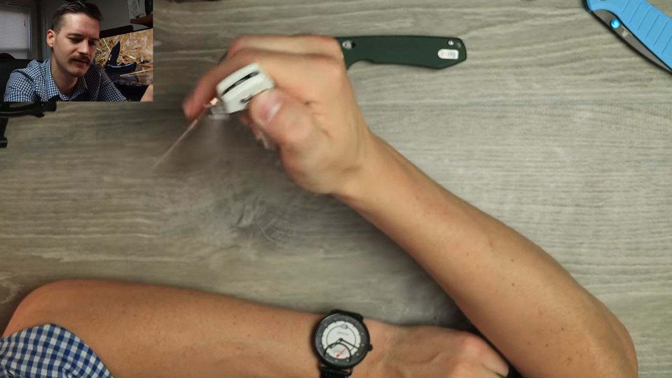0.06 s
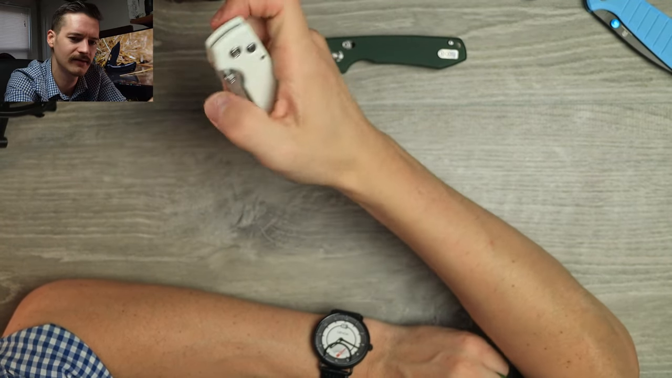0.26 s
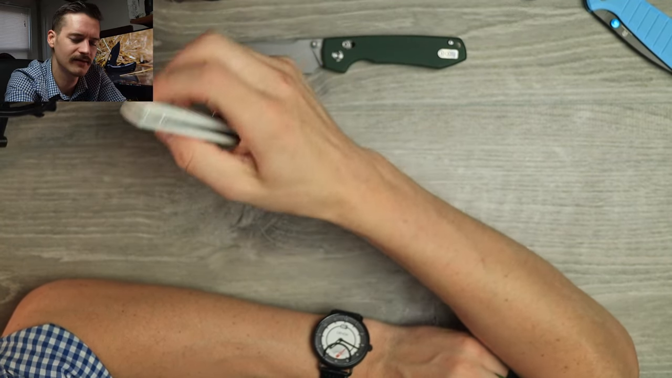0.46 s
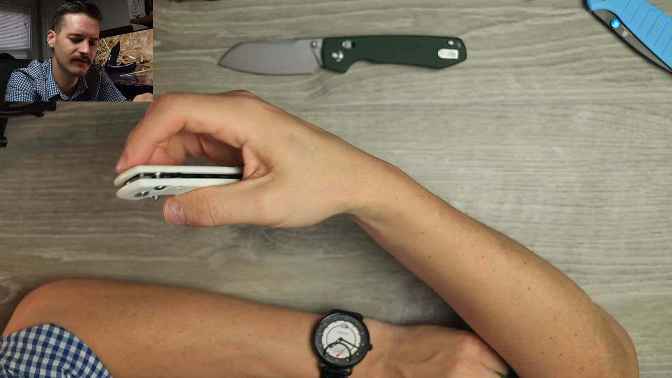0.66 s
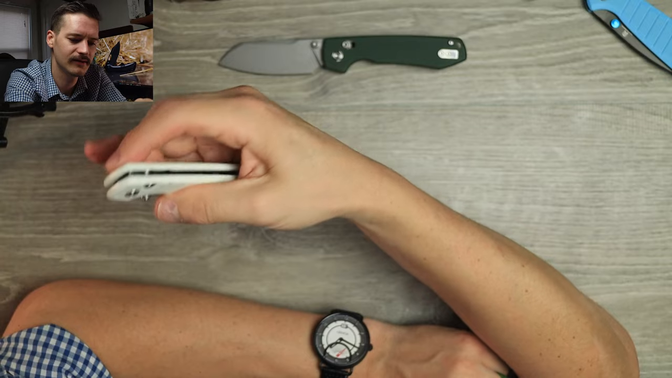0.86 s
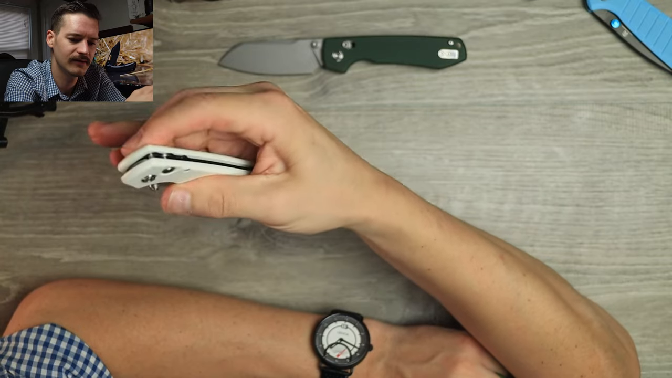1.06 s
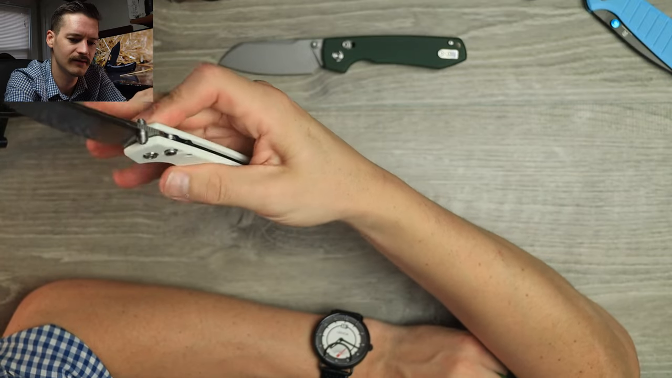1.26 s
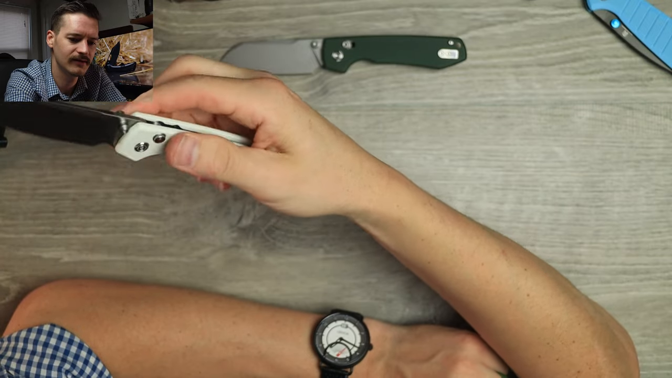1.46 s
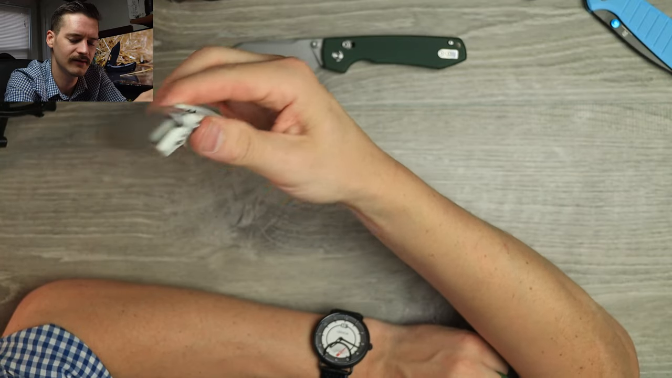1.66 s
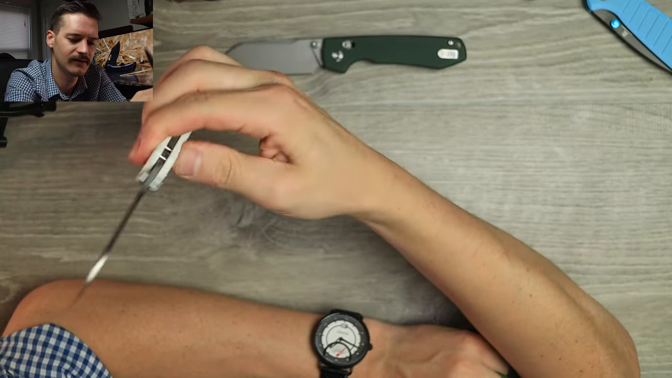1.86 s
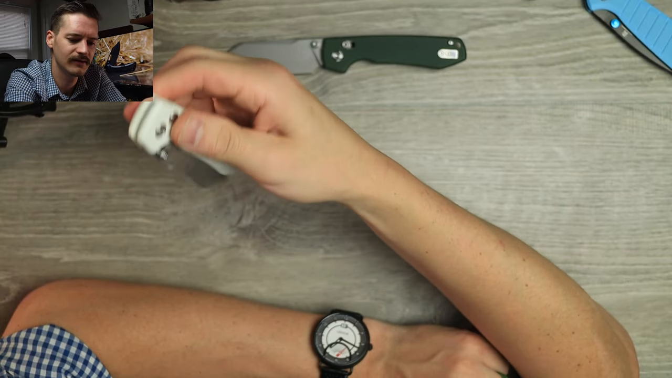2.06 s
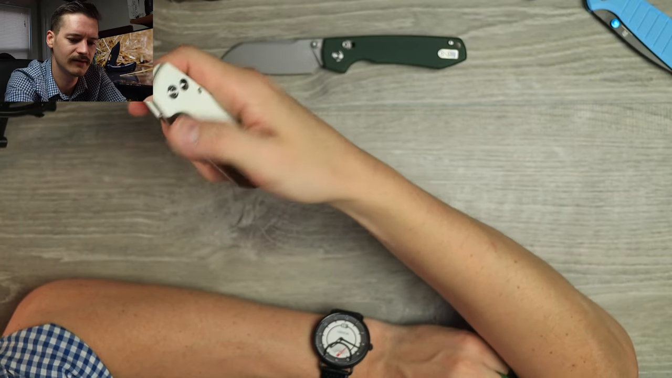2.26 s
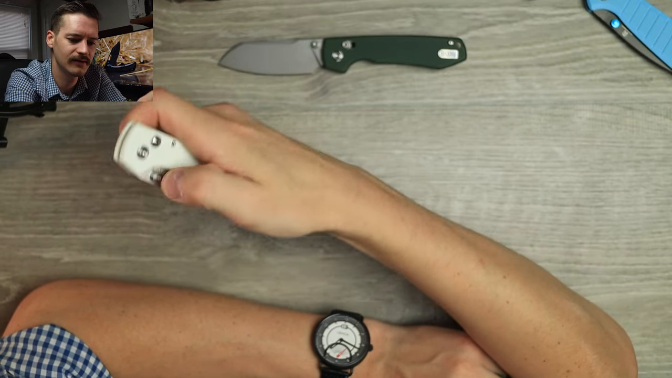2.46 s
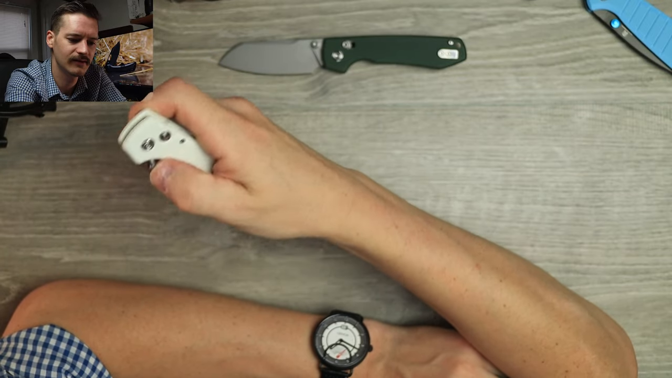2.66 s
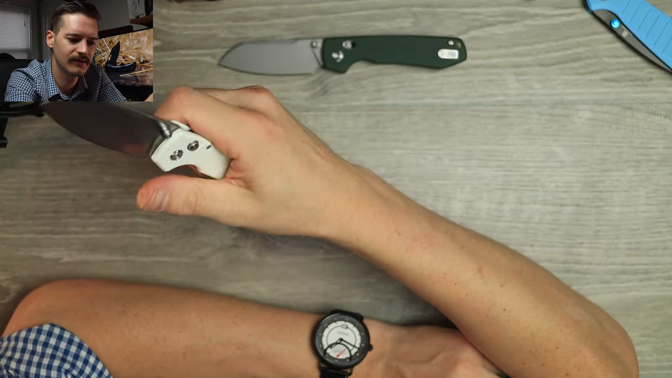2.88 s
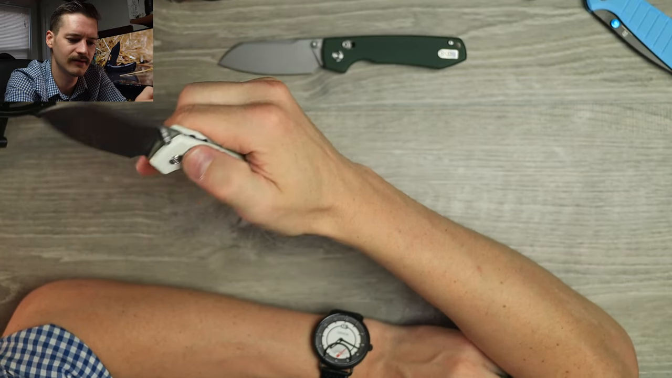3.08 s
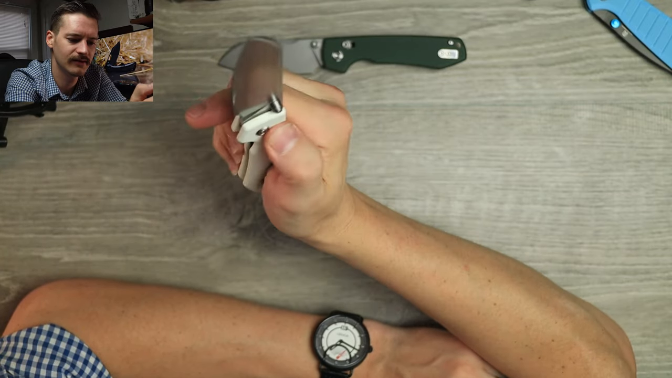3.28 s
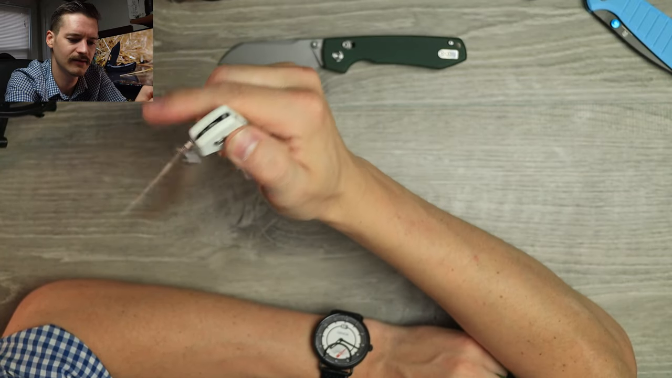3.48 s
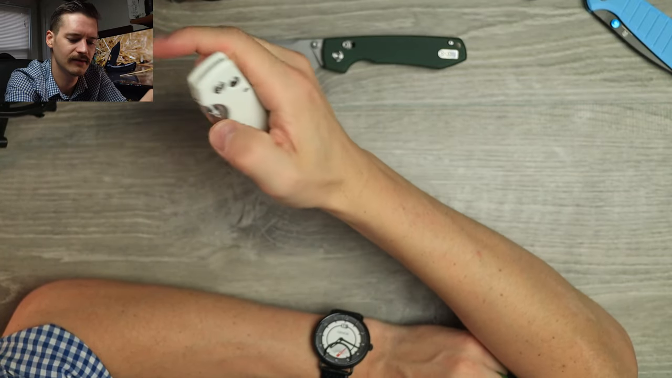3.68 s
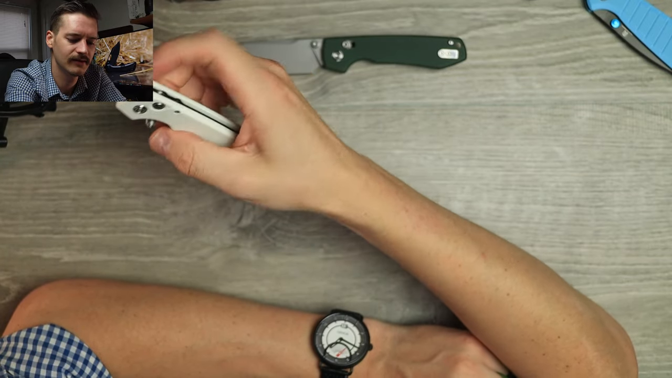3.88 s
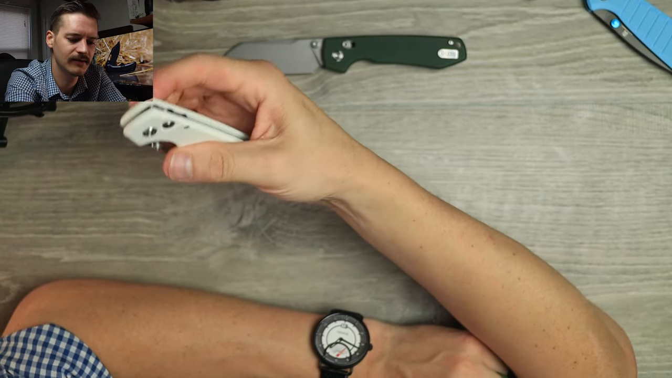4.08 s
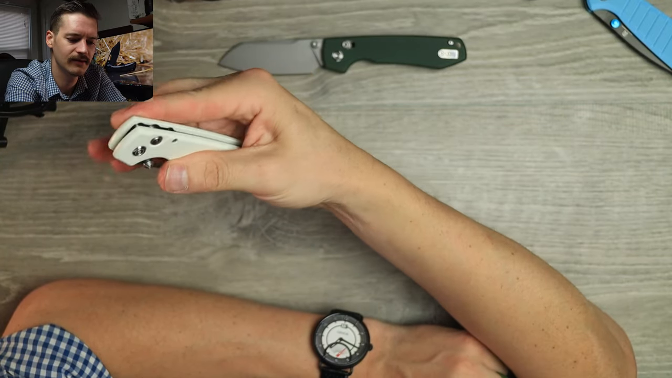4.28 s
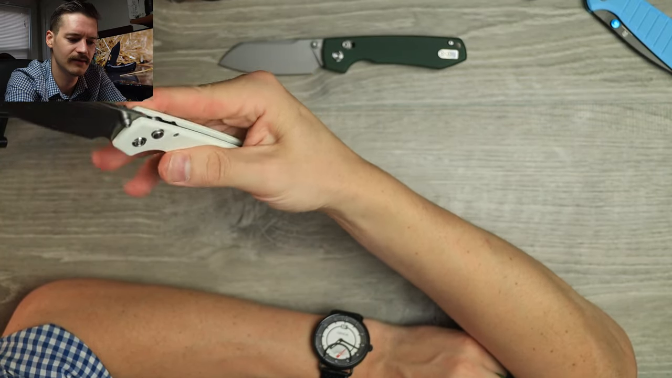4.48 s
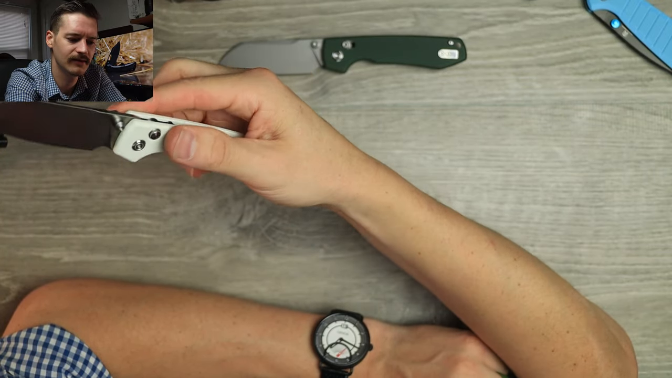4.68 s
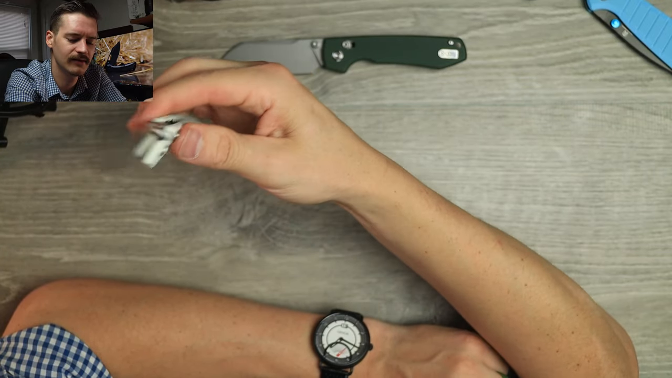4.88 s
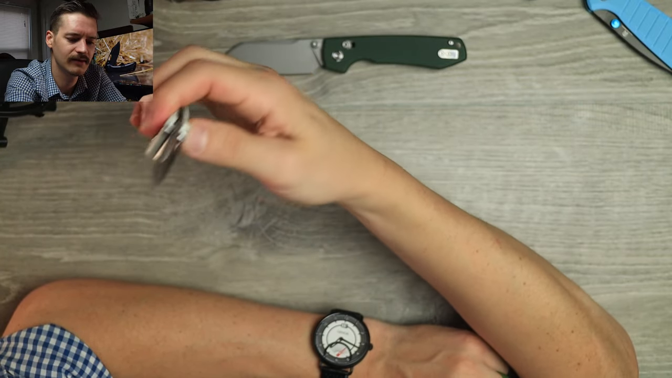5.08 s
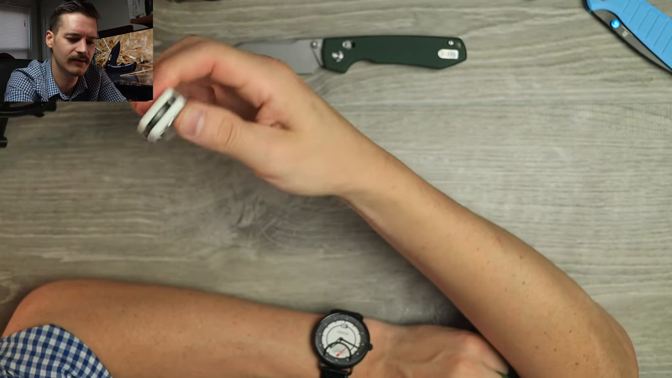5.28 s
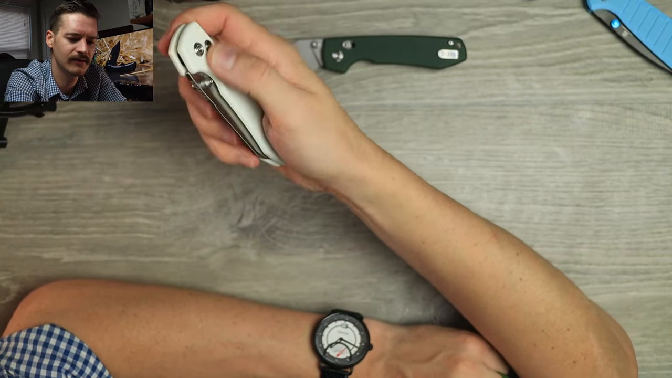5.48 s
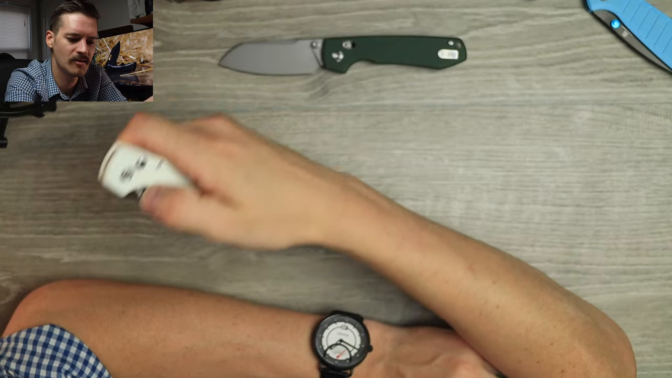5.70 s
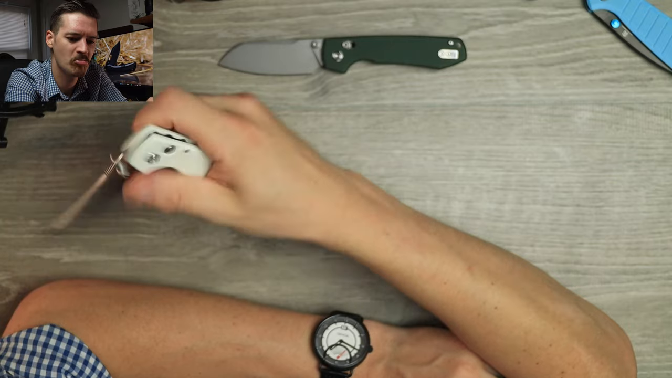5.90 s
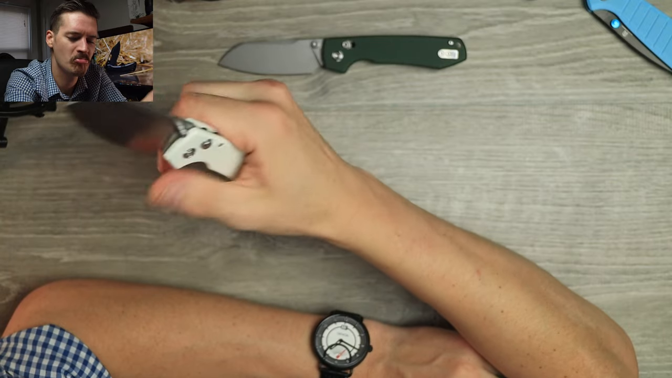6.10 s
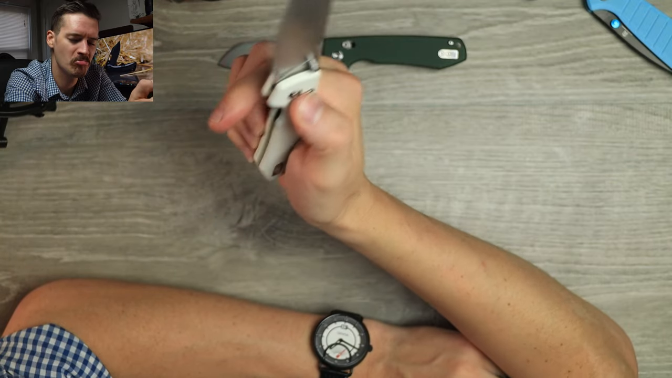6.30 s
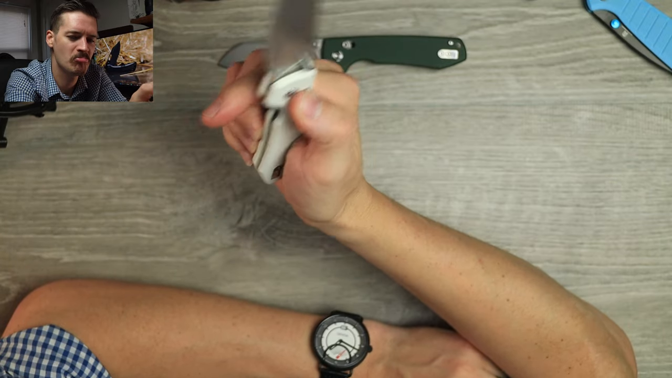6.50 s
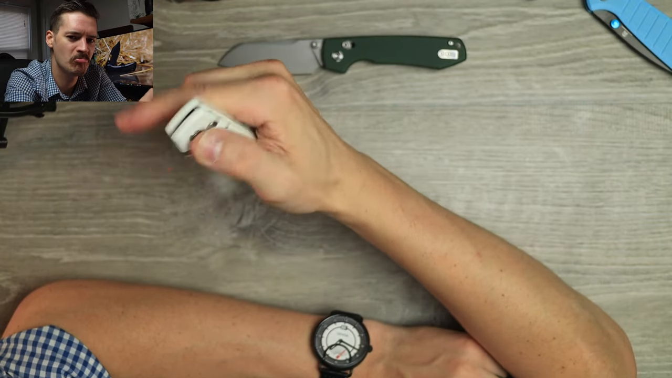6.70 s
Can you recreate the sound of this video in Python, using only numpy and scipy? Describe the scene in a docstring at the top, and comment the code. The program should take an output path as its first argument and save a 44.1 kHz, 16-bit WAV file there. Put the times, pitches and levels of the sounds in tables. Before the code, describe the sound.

Crisp steel snaps alternate as a pocket knife locks open and drops closed, with tiny ticks, skin rubs and soft air puffs over low room rumble.

```python
"""A folding knife is flicked open and dropped shut, again and again, close to a microphone over a desk.
The blade chatters against its stop for a few milliseconds and excites the hand-damped resonances of the knife;
lightly damped blade modes sing on briefly. Pivot and fingers rub as noise through resonances, and each
swing pushes a slow wave of air at the microphone. A small room answers with a decaying diffuse tail,
over steady rumble, hiss and a faint hum."""
import sys
import numpy as np
from scipy import signal
from scipy.fft import rfft, irfft, next_fast_len
from scipy.io import wavfile

SR = 44100
rng = np.random.default_rng(int(sys.argv[2]) if len(sys.argv) > 2 else 0)


def master(y):
    """Save y as 16-bit WAV."""
    cut = np.clip(np.atleast_2d(y).T, -1, 1)
    pcm = np.round(cut * 32767)  # scale
    wavfile.write(sys.argv[1], SR, pcm.astype(np.int16))


N = 297536
SIZE = 16384  # samples in each single sound
HZ = np.maximum(np.fft.rfftfreq(SIZE, 1 / SR), 1)
AGE = np.arange(SIZE) / SR  # s since the start of a sound
MS_GAIN = np.sqrt(SR / 1000)  # sets a level as that of the energy packed into one millisecond


def undb(db):
    """Logarithmic level: decibels to amplitude gain."""
    return 10 ** (np.asarray(db) / 20)


def decay(t60):
    """Exponential decay: the envelope falls by 60 dB in t60 seconds."""
    return undb(-60 * AGE / t60)


def unit(x):
    """Energy normalisation: the squares sum to one."""
    return x / np.sqrt(np.sum(x ** 2))


def add(track, s, sound):
    """Superposition: mix a sound into the track at time s."""
    i = max(int(s * SR), 0)
    track[i:i + len(sound)] += sound[:len(track) - i]


def colour(points, hz):
    """Spectral envelope: gain along (f/Hz, level/dB) points on a log-frequency axis."""
    f, db = np.transpose(points)[:2]
    return undb(np.interp(np.log(np.maximum(hz, 1)), np.log(f), db))


def tilt(db):
    """Spectral slope: dB per octave above 1 kHz, level below it."""
    return undb(db * np.log2(np.maximum(HZ, 1000) / 1000))


def noise(gain, size):
    """Filtered random noise: the given spectrum at an rms of one."""
    x = irfft(rfft(rng.standard_normal(size)) * gain, size)
    return x / x.std()


def causal(gain):
    """Minimum phase: the quickest-dying impulse response with this spectrum, by folding the cepstrum."""
    cepstrum = irfft(np.log(gain + 1e-9))
    cepstrum[1:SIZE // 2] *= 2
    cepstrum[SIZE // 2 + 1:] = 0
    return irfft(np.exp(rfft(cepstrum)))


def through(sound, response):
    """Linear filtering: convolve a sound with an impulse response."""
    return signal.fftconvolve(sound, response)[:SIZE]


def resonances(hz, width, db):
    """Modal resonance: the summed power response of damped modes, as a gain."""
    detune = (HZ ** 2 - hz ** 2) / (HZ * width)
    return np.sqrt(np.sum((undb(db) / (1 + detune ** 2)) ** 2, axis=0))


def by_grip(first, second, grip):
    """Linear interpolation: blend the values of two grips."""
    return first + grip * (second - first)


# spectrum of room rumble and hiss: f/Hz, relative level/dB
RUMBLE_AND_HISS = [(20, -3), (31, -2.5), (45, -11.5), (98, -6), (130, -10.5), (400, -15.5), (520, -22),
                   (1150, -24.5), (1370, -24.5), (1600, -22.5), (3740, -37), (8000, -45), (13200, -52.5),
                   (16000, -57.5)]
FLOOR_DB = -56.5  # rms level of rumble and hiss
# hum and whirr of equipment: f/Hz, half-width at half amplitude/Hz, rms level/dB
EQUIPMENT_HUM = [(100.6, 1.7, -67), (306, 4, -79.5), (1170, 60, -71.5), (1610, 69, -76)]


def background():
    """Incoherent addition: rumble, hiss and narrow lines of running equipment add in power."""
    size = next_fast_len(N, True)
    hz = np.fft.rfftfreq(size, 1 / SR)
    # the microphone rolls off the deepest rumble
    roll_off = hz / np.hypot(hz, 25)
    power = (undb(FLOOR_DB) * unit(colour(RUMBLE_AND_HISS, hz) * roll_off)) ** 2
    for centre, width, db in EQUIPMENT_HUM:
        line = unit(1 / (1 + ((hz - centre) / width) ** 2))
        power += (undb(db) * line) ** 2
    return np.sqrt(power.sum()) * noise(np.sqrt(power), size)[:N]


# bands of the room's answer: f/Hz, relative level/dB, t60/s
ROOM_BANDS = [(300, -7, 0.13), (1000, -0.5, .27), (2500, -2, .27), (5000, 4, 0.2), (7900, 0, 0.17),
              (11000, -1.5, 0.17), (11700, -7, 0.17), (16000, -7.5, 0.25)]


def room(delay_s=0.0037, build_s=0.0017):
    """Diffuse reverberation: random noise, drawn anew each time, decays at its own rate in each band."""
    hiss = rfft(rng.standard_normal(SIZE))
    centres = np.log([row[0] for row in ROOM_BANDS])
    tail = 0
    # overlapping bands whose shares add up to one
    for share, (_, band_db, t60) in zip(np.eye(len(ROOM_BANDS)), ROOM_BANDS):
        band = irfft(hiss * np.interp(np.log(HZ), centres, share))
        tail = tail + band * undb(band_db) * decay(t60)
    return unit(tail * np.clip((AGE - delay_s) / build_s, 0, 1))


# resonances of the rubbed blade and liners: f/Hz, full width at half gain/Hz, relative level/dB
RUBBED_MODES = [(1700, 1400, -17), (3340, 550, -6), (4700, 500, -2.5), (6300, 2800, -1), (8400, 900, 3),
                (9600, 1700, -3.5), (11200, 900, -2.5), (12700, 5100, -3.5), (14500, 5400, -3.5)]


def friction(db, tilt_db, grain_db=3.0, stutter_db=2.5, spot_db=3):
    """Stick-slip friction: dense tiny slips of skin and steel ring the knife."""
    hz, width, mode_db = np.transpose(RUBBED_MODES)[:, :, None]
    slips = rng.standard_normal(SIZE) * undb(grain_db * rng.exponential(size=SIZE))
    # each stroke touches another spot and favours other modes
    body = resonances(hz, width, mode_db + spot_db * rng.standard_normal(hz.shape))
    rub = through(slips, causal(body * tilt(tilt_db)))
    # the level stutters at rates below 90 Hz
    return rub / rub.std() * undb(db + stutter_db * noise(HZ < 90, SIZE))


def stroke(length, swell=1.2):
    """Velocity envelope: a finger starts, slides and stops."""
    return np.sin(np.pi * np.clip(AGE / abs(length), 0, 1)) ** swell


FIDGETS_PER_S, FIDGET_S = 2.2, .05  # mean length of a fidget in s
FIDGET_DB, FIDGET_SPREAD_DB, FIDGET_TILT_DB = -73, 3, -3  # level, spread to either side, dB per octave


def fidgets():
    """Random timing: faint short strokes at independent, uniformly drawn moments."""
    out = np.zeros(N)
    for when, strength, length in rng.random((int(FIDGETS_PER_S * N / SR), 3)):
        db = FIDGET_DB + FIDGET_SPREAD_DB * (2 * strength - 1)
        rub = stroke(FIDGET_S * (.5 + length)) * friction(db, FIDGET_TILT_DB)
        add(out, when * N / SR, rub)
    return out


# the fingers slide to a new hold: start t/s, length/s, level/dB, tilt/(dB per octave)
FINGER_RUBS = [(.486, .1, -70.5, -3), (0.634, .051, -58.5, -1.5), (1.485, 0.078, -66.5, -2),
               (1.678, 0.094, -63.5, -1.5), (2.149, 0.1, -62.5, -1), (3.858, .045, -60, -8),
               (3.896, 0.13, -65, 2), (4.042, 0.06, -61.5, 0), (4.145, 0.025, -59, 6), (4.23, .022, -64, 4),
               (4.674, 0.048, -58, -1), (4.872, 0.14, -64, -2.5), (5.499, 0.17, -63.5, -3.5)]
# before a flick the finger scrapes harder until the detent lets go, then the friction dies away
PUSH_S, FLICK_DB, FLIGHT_FADE_DB_PER_S = .0215, -48, 550.5
FINGER_TILT_DB, THUMB_TILT_DB = 0, -4.5  # dB per octave
# the pivot rubs as the blade swings in
SWING_S, SWING_DB, SWING_TILT_DB = .068, -50.5, -5  # level relative to the landing, dB per octave
# after each snap the grip relaxes with a faint rub
SETTLE_DELAY_S, SETTLE_S, SETTLE_DB, SETTLE_TILT_DB = 0.15, 0.082, -72.5, -3


def rubbing(room_db=-11, push_power=.5, swing_power=0.65):
    """Sliding friction: loudness follows effort or speed before each snap, after it and in between."""
    out = np.zeros(N)
    for s, _, _, grip, *_, flight, _ in OPEN_SNAPS:
        push = np.minimum(AGE / PUSH_S, 1) ** push_power
        fade = undb(-FLIGHT_FADE_DB_PER_S * np.maximum(AGE - PUSH_S, 0))
        rub = friction(FLICK_DB, by_grip(FINGER_TILT_DB, THUMB_TILT_DB, grip))
        add(out, s - flight - PUSH_S, push * fade * rub)
    for s, db, *_ in SHUT_SNAPS:
        speed = (AGE / SWING_S) ** swing_power * (AGE < SWING_S)
        add(out, s - SWING_S, speed * friction(db + SWING_DB, SWING_TILT_DB))
    for s, *_ in OPEN_SNAPS + SHUT_SNAPS:
        add(out, s + SETTLE_DELAY_S, stroke(SETTLE_S) * friction(SETTLE_DB, SETTLE_TILT_DB))
    for s, length, db, tilt_db in FINGER_RUBS:
        add(out, s, stroke(length) * friction(db, tilt_db))
    out += fidgets()
    return out + undb(room_db) * signal.oaconvolve(out, room())[:N]


# air pushed by the flick and by the recoil of the hand:
# delay after the lock t/s, level/dB with finger, level/dB with thumb, f/Hz with finger, f/Hz with thumb
FLICK_WAVES = [(-.025, -33, -41, 37.88, 50), (.015, -35, -35.5, 30, 62)]
CLOSING_AIR_DB, CLOSING_AIR_HZ = -35.5, 50  # level relative to the landing
AIR_CYCLES = .65  # half the length of a wave of air, to 1/e of its envelope


def air():
    """Bulk airflow: each swing sends a slow wave over the microphone; a finger flick moves the hand further."""
    waves = [(s, db + CLOSING_AIR_DB, CLOSING_AIR_HZ) for s, db, *_ in SHUT_SNAPS]
    for s, _, _, grip, *_ in OPEN_SNAPS:
        for delay, finger_db, thumb_db, finger_hz, thumb_hz in FLICK_WAVES:
            db = by_grip(finger_db, thumb_db, grip)
            waves.append((s + delay, db, by_grip(finger_hz, thumb_hz, grip)))
    out = np.zeros(N)
    lead_s = .1  # room for the rise before the centre of the wave
    for s, db, hz in waves:
        cycles = hz * (AGE - lead_s)
        envelope = np.exp(-(cycles / AIR_CYCLES) ** 2)
        add(out, s - lead_s, -undb(db) * np.sin(2 * np.pi * cycles) * envelope)
    return out


def chatter(ms, fade=.7, count=40, size=1024):
    """Repeated contact: a brief, weakening rattle of steel on steel that holds all frequencies evenly."""
    share = AGE[:size] / (ms / 1000)
    x = rng.standard_normal(size) * np.exp(-fade * share)
    # alternate between a flat spectrum and a limited duration
    for _ in range(count):
        spectrum = rfft(x * (share < 1))
        x = irfft(spectrum / (abs(spectrum) + 1e-9))
    return x * (share < 1)


def blow(modes, db, ms, grip, tilt_db, pitch, room_db, buzz_db, buzz_t60=0.018, focus=0.6):
    """Impact excitation: chatter drives the knife's resonances, then the buzz and the room follow."""
    hz, width, first_db, second_db = np.transpose(modes)[:, :, None]
    # the hand damps different resonances in each grip
    body = resonances(hz * pitch, width, by_grip(first_db, second_db, grip))
    contacts = chatter(ms)
    direct = unit(through(contacts, causal(body * tilt(tilt_db))))
    # summed over all directions the knife radiates a more even spectrum
    scattered = unit(through(contacts, causal(body ** focus * tilt(tilt_db))))
    # liners and screws buzz for a moment after the blow
    buzz = unit(rng.standard_normal(SIZE) * decay(buzz_t60) * (AGE > .0015))
    buzz = unit(through(buzz, causal(tilt(-1.7))))
    after = through(scattered, undb(buzz_db) * buzz + undb(room_db) * room())
    return undb(db) * MS_GAIN * (direct + after)


def blade_ring(modes, db, grip):
    """Free vibration: decaying sine modes sing on after a blow, favoured according to the grip."""
    ring = 0
    for hz, first_db, second_db, t60 in modes:
        wander = 1 + .001 * rng.standard_normal()
        mode = np.sin(2 * np.pi * hz * wander * AGE) * decay(t60)
        ring = ring + unit(mode) * undb(by_grip(first_db, second_db, grip))
    return ring * undb(db) * MS_GAIN


def grazed(snaps, graze_db=-24, graze_s=.0011):
    """Precursor contact: the blade grazes the lock bar just before it lands, a faint early copy of the snap."""
    return snaps + undb(graze_db) * np.roll(snaps, -int(graze_s * SR))


def tick(db, tilt_db, buzz_db=-9, room_db=-13):
    """Weak impact: a light touch of steel on steel rings the open knife's resonances."""
    return blow(OPEN_MODES, db, ms=1.1, grip=.65, tilt_db=tilt_db, pitch=1.02, room_db=room_db, buzz_db=buzz_db)


# the lock bar and the loose blade tick in the hand: t/s, level/dB, tilt/(dB per octave)
HAND_TICKS = [(0.7228, -56.5, 3), (1.795, -43.5, 1.5), (2.0173, -46.5, 1), (3.2247, -47.5, -3),
              (3.2482, -42.5, 0), (3.3589, -48, -3), (3.8802, -48.5, -1), (3.9229, -46.5, 3),
              (4.0409, -35.5, 5.5), (5.3146, -49.5, 0), (6.369, -54.5, -2.5)]


def ticks():
    """Isolated weak impacts: loose parts touch while the knife is handled."""
    out = np.zeros(N)
    for s, db, tilt_db in HAND_TICKS:
        add(out, s, tick(db, tilt_db))
    return out


# resonances of the shut knife:
# f/Hz, full width at half gain/Hz, level/dB in a loose grip, level/dB in a firm grip
SHUT_MODES = [(600, 2100, -24, -31.5), (956, 230, -24.5, -18.5), (1840, 180, -4, -11), (2109, 314, -9, -10),
              (2990, 470, -9.5, -12), (3670, 180, -15, -12.5), (4240, 850, -11, -13.5),
              (5010, 170, -7.5, 2.5), (5460, 240, -11.5, -6), (5893, 590, -28, 1.5), (6560, 610, 1.5, -7.5),
              (7460, 1000, -16.5, -12), (8080, 349, -4.5, -13.5), (8670, 270, -8.5, -7),
              (9159, 570, -13.5, -11.5), (9780, 510, -20.5, -10.5), (10300, 301, -8, -26.5),
              (11680, 890, -19, -18), (13300, 2400, -19.5, -28.5), (13900, 840, -8.5, -17.5),
              (14700, 1116, -22.5, -23)]
# the blade held in the shut handle: f/Hz, level/dB in a loose grip, level/dB in a firm grip, t60/s
HELD_BLADE_MODES = [(1940, -26, -32, 0.092), (4940, -38.5, -26.5, 0.13), (5170, -27.5, -30, 0.1),
                    (5560, -32, -28.5, .17), (5910, -32, -27, .16), (6600, -21, -32.5, 0.063),
                    (8150, -23.5, -40, 0.097), (13900, -30.5, -42.5, .08)]
# the blade falls shut or the lock bar clicks: t/s, level/dB, chatter/ms, grip (0 loose - 1 firm),
# tilt/(dB per octave), pitch factor, room level/dB, buzz level/dB
SHUT_SNAPS = [(0.1956, -9, 3.2, 0.029, 0.9, 1.006, -19, -10.5),
              (2.0716, -6.5, 3.44, 0.96, 0.9, 0.997, -25.5, -13.5),
              (2.4193, -29, 3, 0.81, 0.4, 0.94, -18.5, 1.5),
              (3.6234, -8.5, 2.66, 0.12, 2.5, 0.99, -22, -14),
              (5.3891, -8, 4.2, 0.89, 0.2, 0.971, -23.5, -12), (5.5629, -26.3, 4.8, .4, 1.5, 0.98, -29, -9)]
BRUSH_LEAD_S, BRUSH_DB = 0.01, -48.5
REBOUND_S, REBOUND_DB = 0.025, -31.5  # level relative to the landing


def closings():
    """Impact and rebound: the blade brushes the detent, lands on its stop and bounces once."""
    snaps, out = np.zeros(N), np.zeros(N)
    for s, db, ms, grip, tilt_db, pitch, room_db, buzz_db in SHUT_SNAPS:
        add(snaps, s, blow(SHUT_MODES, db, ms, grip, tilt_db, pitch, room_db, buzz_db, buzz_t60=0.024))
        add(out, s, blade_ring(HELD_BLADE_MODES, db, grip))
        add(out, s - BRUSH_LEAD_S, tick(BRUSH_DB, tilt_db=0.5))
        add(out, s + REBOUND_S, tick(db + REBOUND_DB, tilt_db=1.0))
    return out + grazed(snaps)


def thud(db, hz=80, t60=.09):
    """Damped oscillation: the low bump of the hand as it stops the knife."""
    return undb(db) * np.sin(2 * np.pi * hz * AGE) * decay(t60)


def knock(hz=210, t60=0.02):
    """Damped recoil: the dull rebound of the handle in the palm."""
    return unit(np.sin(2 * np.pi * hz * AGE) * decay(t60)) * MS_GAIN


def pivot_buzz(db, t60=0.056, tilt_db=-2.0):
    """Forced vibration: the released blade rattles on its pivot and rings the knife."""
    hz, width, finger_db, thumb_db = np.transpose(OPEN_MODES)[:, :, None]
    body = resonances(hz, width, (finger_db + thumb_db) / 2)
    rattle = rng.standard_normal(SIZE) * decay(t60)
    return undb(db) * MS_GAIN * unit(through(rattle, causal(body * tilt(tilt_db))))


# resonances of the open knife:
# f/Hz, full width at half gain/Hz, level/dB after a finger flick, level/dB after a thumb flick
OPEN_MODES = [(780, 530, -14.5, -20.5), (1084, 295, -13, -21), (1345, 55, -22, -23),
              (2000, 680, -12.5, -12.5), (2380, 420, -12.5, -21.5), (2820, 455, -33.5, -5),
              (3200, 1100, -16.5, -6), (3700, 450, -11.5, -29.5), (4820, 560, 2, -13),
              (5140, 356, -15.5, -1.5), (5250, 1600, -9, -8.5), (6400, 160, -15.5, -2.5),
              (7040, 1399, -13, -23.5), (7418, 410, -10, -6), (8150, 870, -9, -0.5), (8680, 440, -10, -13),
              (9360, 3100, -16.5, -13), (11200, 720, -11, -31.5), (10900, 1200, -20, -10.5),
              (12170, 1800, -14.5, -27.5), (13200, 430, -25, -18), (13800, 1700, -16.5, -18)]
# free ringing of the open blade: f/Hz, level/dB after a finger flick, level/dB after a thumb flick, t60/s
OPEN_BLADE_MODES = [(2910, -42, -28.5, 0.13), (3068, -29.5, -26, .33), (3765, -35.5, -41, .23),
                    (4690, -19.5, -27.5, 0.22), (4800, -20.5, -29.5, 0.19), (5030, -15.5, -26, 0.075),
                    (5680, -29, -36, .17), (6150, -29, -33, 0.17), (8300, -26.5, -32, .14),
                    (8516, -29, -30, 0.11), (14100, -34, -50, .1)]
# the blade is flicked open and locks: t/s, level/dB, chatter/ms, grip (0 finger - 1 thumb),
# tilt/(dB per octave), pitch factor, room level/dB, blade ring level/dB,
# flight from detent to lock/s, detent click level/dB
OPEN_SNAPS = [(1.2339, -3.5, 2.2, .05, 1.1, 1, -19.5, -7.5, 0.032, -30),
              (2.8391, -2.5, 1.6, .95, -0.1, 0.97, -21, -3, 0.036, -45),
              (4.5045, -3, 2.3, .03, 0.57, 1.005, -21.5, -3.5, .0386, -27),
              (6.0420, -1.5, 1.57, .97, 0.5, 0.99, -22.5, -3.5, 0.035, -41.5)]
DETENT_TILT_DB = 7  # dB per octave


def openings(buzz_db=-11.0, knock_db=-32, shudder_s=0.028, shudder_db=-28, pivot_db=-38, thud_db=-33):
    """Impact and free decay: the blade leaves its detent, strikes the lock and sings on."""
    snaps, out = np.zeros(N), np.zeros(N)
    for s, db, ms, grip, tilt_db, pitch, room_db, ring_db, flight, detent_db in OPEN_SNAPS:
        add(out, s - flight, tick(detent_db, DETENT_TILT_DB) + pivot_buzz(pivot_db))
        add(snaps, s, blow(OPEN_MODES, db, ms, grip, tilt_db, pitch, room_db, buzz_db))
        add(out, s, blade_ring(OPEN_BLADE_MODES, db + ring_db, grip))
        add(out, s, undb(db + knock_db) * knock())
        add(out, s, thud(db + thud_db))
        # after a finger flick the blade shudders once against the lock
        add(out, s + shudder_s, (1 - grip) * tick(db + shudder_db, tilt_db=1.5))
    return out + grazed(snaps)


def scene():
    """Superposition: room, hand and knife add in one channel."""
    knife = ticks() + closings() + openings()
    return (background() + rubbing() + air() + knife)[None]


def record(dry):
    """Clipping and band-limiting: peaks beyond full scale are clipped, then the top is cut."""
    clipped = np.clip(dry, -1, 1)
    low_pass = signal.ellip(8, .2, 70, 15900, fs=SR, output="sos")  # ripple dB, stopband dB, edge Hz
    return signal.sosfilt(low_pass, clipped)


dry = scene()
out = record(dry)
master(out)
```